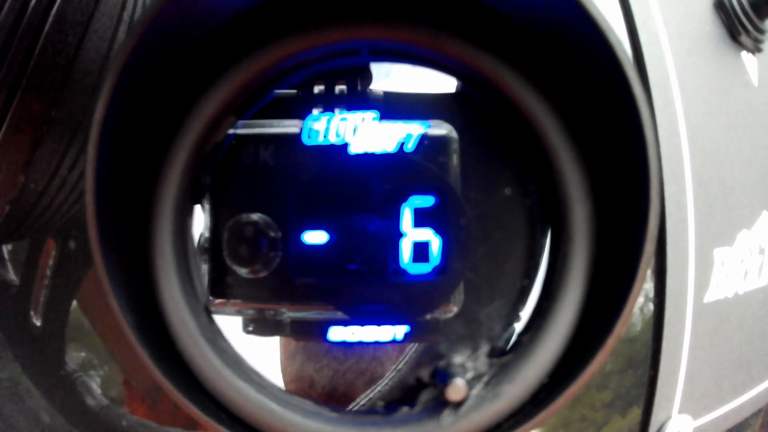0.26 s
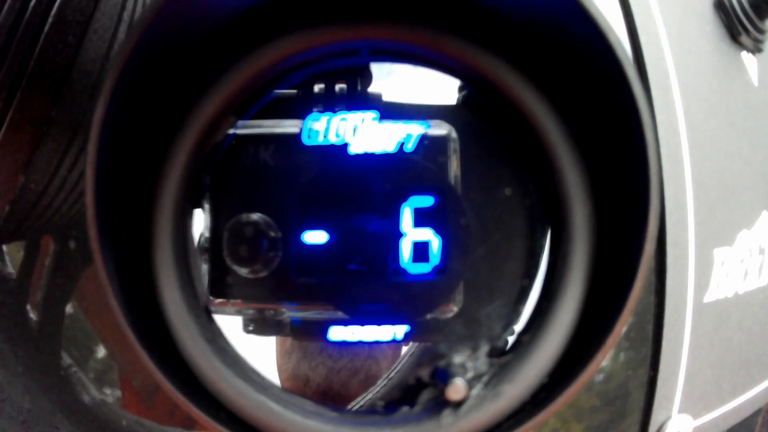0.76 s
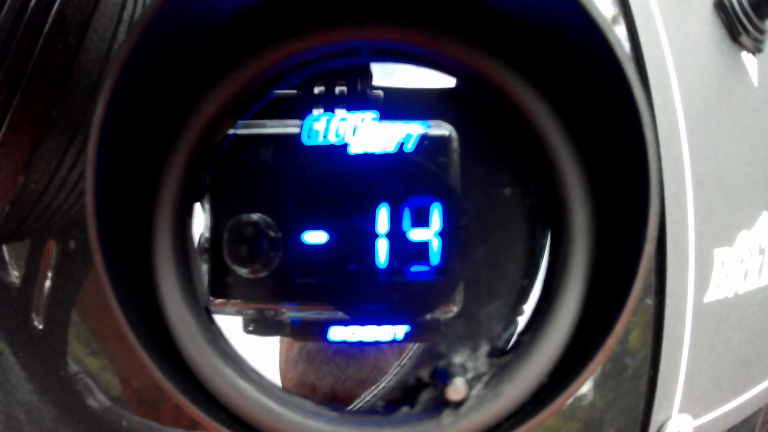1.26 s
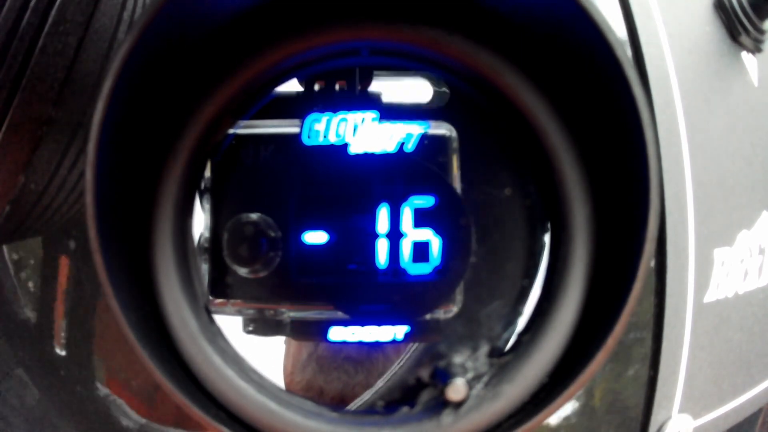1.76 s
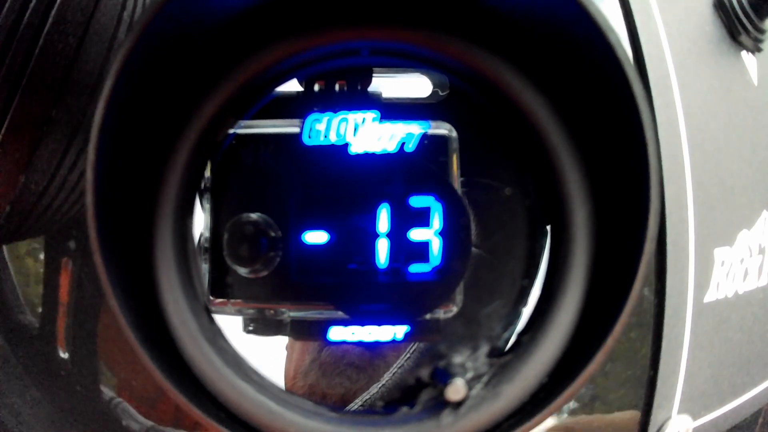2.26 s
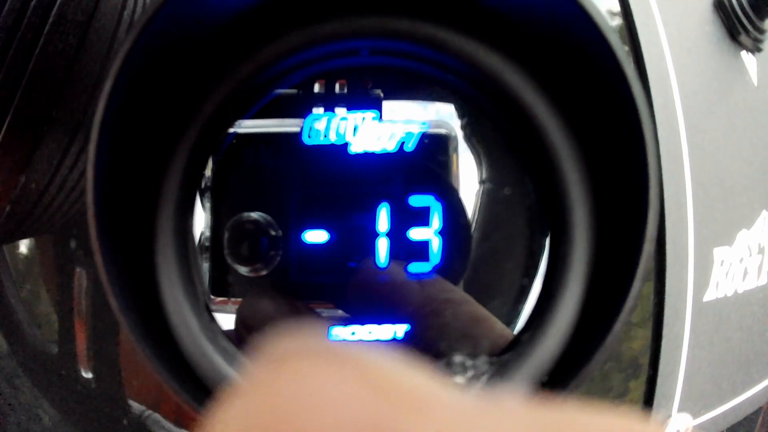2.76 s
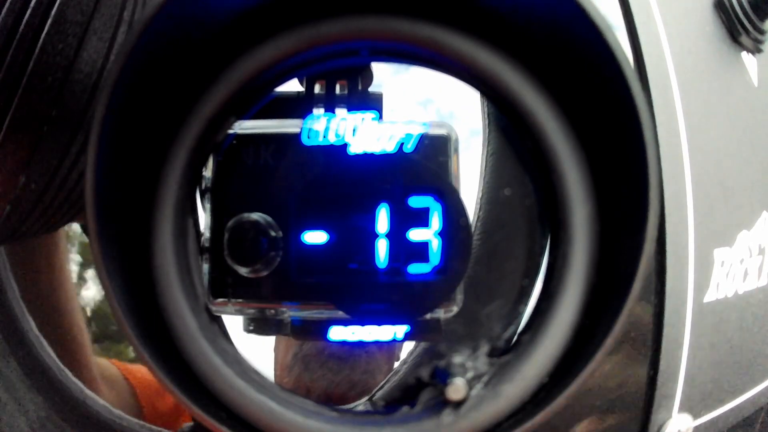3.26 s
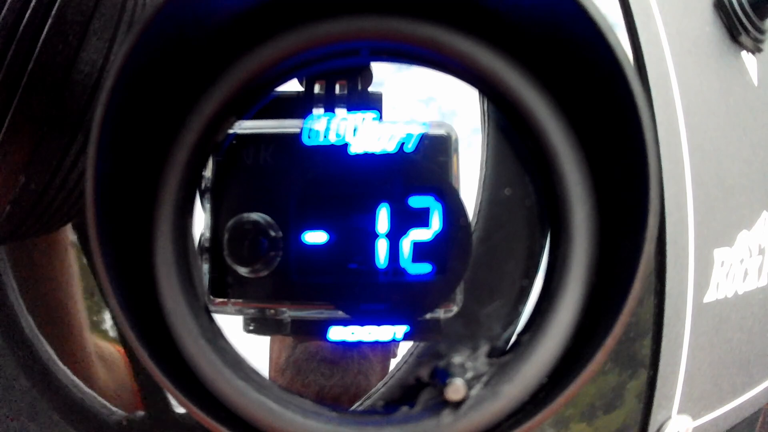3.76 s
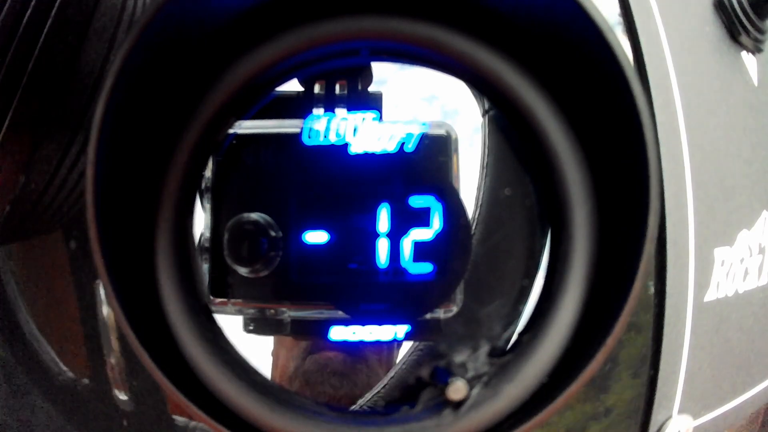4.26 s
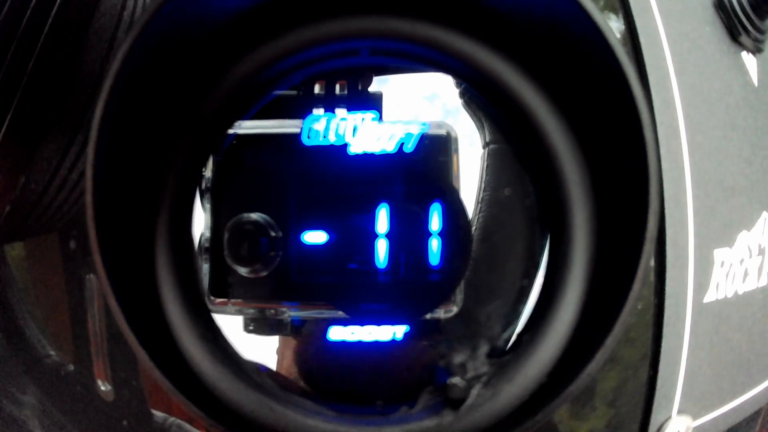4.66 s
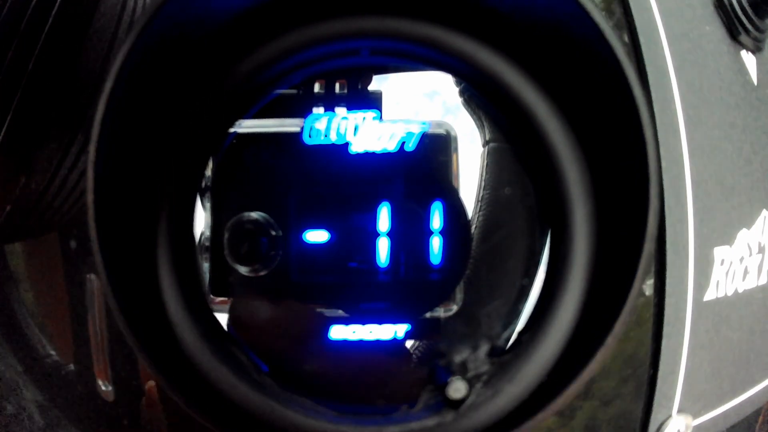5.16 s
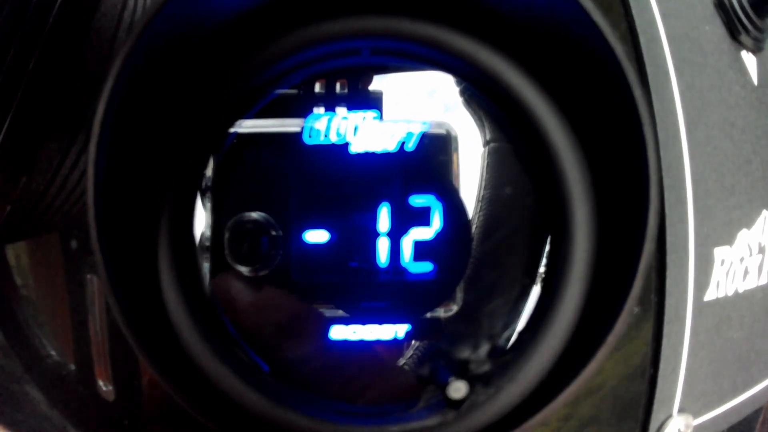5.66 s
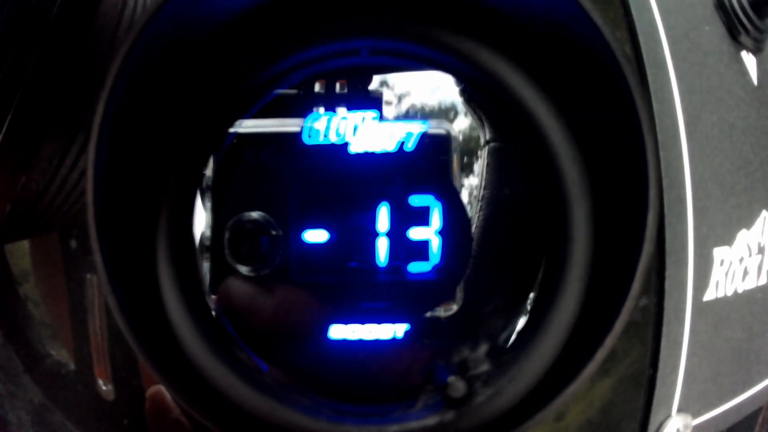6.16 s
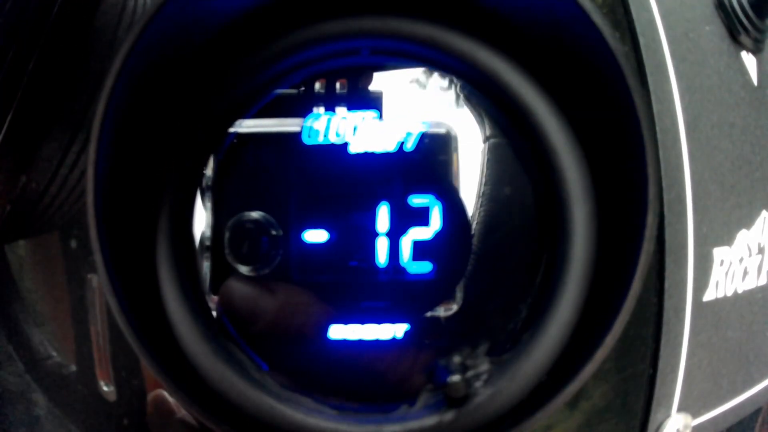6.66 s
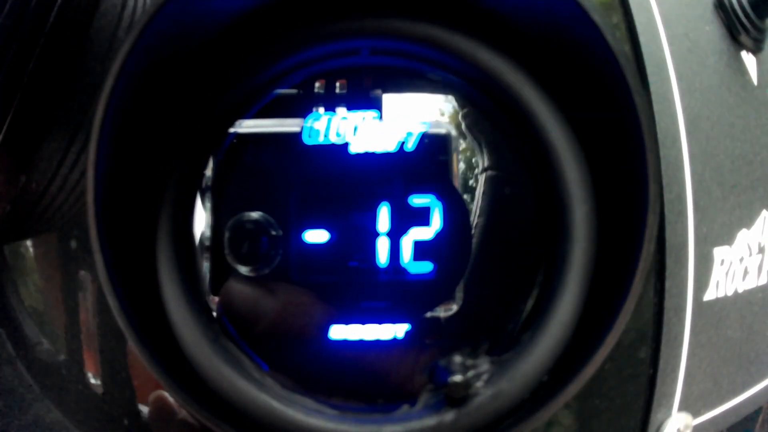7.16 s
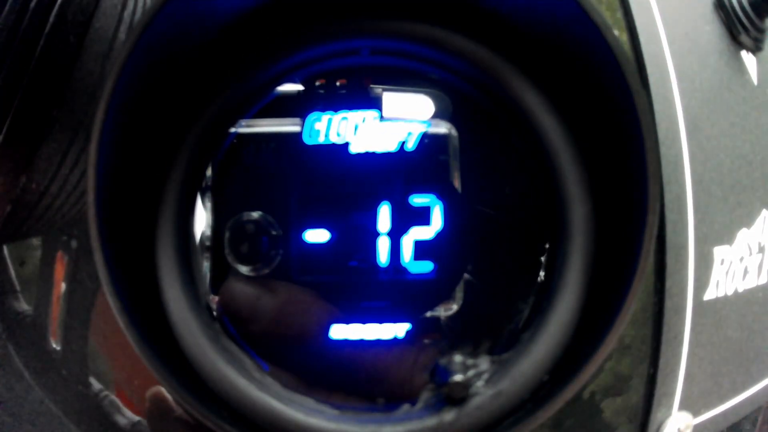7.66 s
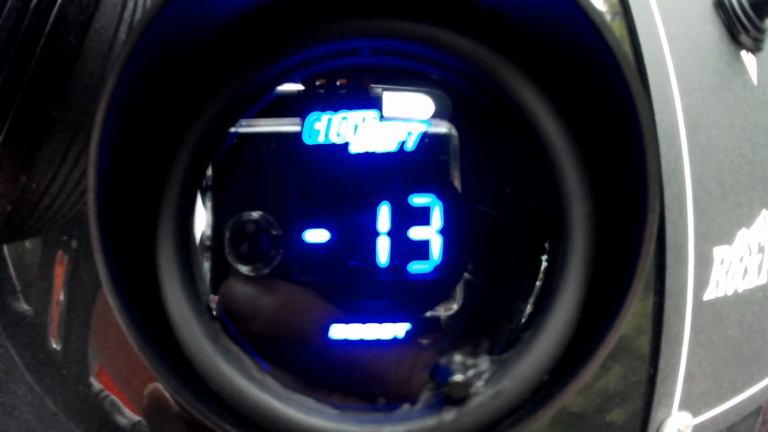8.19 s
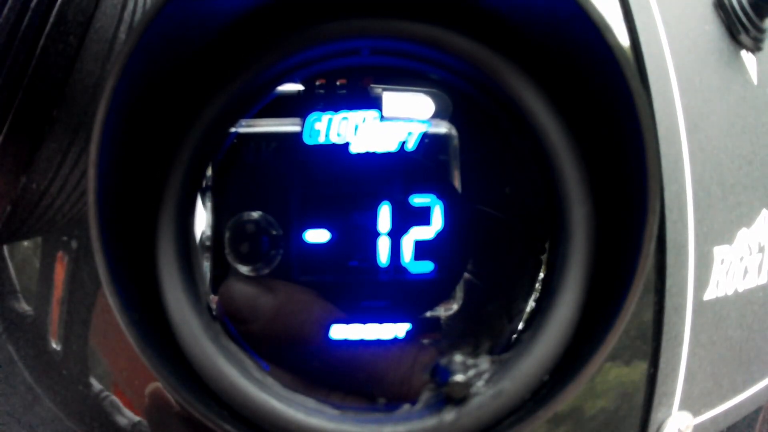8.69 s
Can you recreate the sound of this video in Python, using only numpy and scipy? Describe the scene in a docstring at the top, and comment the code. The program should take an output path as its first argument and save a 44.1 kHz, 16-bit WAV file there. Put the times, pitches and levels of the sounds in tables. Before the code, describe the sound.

Close on a jet boat through a sealed, boxy housing. From 0 s a three-cylinder engine drones loudly at high revs, coarse exhaust roar and spray hiss around it, peaks distorting, with spits and sharp overload clicks mostly in the first second. A thin supercharger whine near 3.9 kHz sinks to below 3 kHz and disappears by about 1.4 s; a faint octave flickers above it. Low thumps hit the case near 0.3 s and between 1.1 and 1.8 s. The throttle shuts around 1.3 s; pitch and level tumble unevenly, settling by 2.5 s into a far quieter idle, a hum near 260 Hz gently hunting about twice a second over muffled exhaust. At 3.3 s the sound snaps out for an instant with a click, then thumps follow at 3.4, 3.7 and 4.1 s. Soft scuffs brush the case at 5.4 s, brighter, and 5.9 s, duller. Idle and low buffeting continue to 8.9 s.

```python
"""Jet boat engine running down to idle

A three-cylinder jet boat engine, heard through a sealed housing, runs down from high revs and settles at idle.
Exhaust orders (tones on multiples of the crank speed) drone in the hull; a supercharger whine sinks away.
Exhaust and spray roar as noise shaped by the resonances of hull and housing; spits and overload clicks crackle.
Low buffeting, thumps and scuffs sound on the case; the sound cuts out once with a click. The loudest peaks clip."""
import sys
import numpy as np
from scipy import signal
from scipy.fft import rfft, irfft, next_fast_len
from scipy.io import wavfile
from scipy.ndimage import map_coordinates

SR = 44100
rng = np.random.default_rng(int(sys.argv[2]) if len(sys.argv) > 2 else 0)


def to_wav(sig):
    """Store sig (one row per channel, or 1-D mono) as 16-bit WAV at the path in sys.argv[1].

    Samples outside -1..1 are clipped; the rate is SR.
    """
    pcm = np.clip(np.atleast_2d(sig), -1, 1) * 32767
    pcm = np.round(pcm).astype(np.int16)
    wavfile.write(sys.argv[1], SR, pcm.T)  # frames by channels


def convert_level_to_amplitude(level_db):
    """Map a level in decibels to its linear amplitude factor."""
    exponent = np.asarray(level_db, float) / 20
    return 10 ** exponent


N = 393805  # length [samples]


def unit(x):
    """Scaled to rms 1."""
    return x / np.sqrt(np.mean(x ** 2) + 1e-20)


def curves(rows):
    """One value per sample for each column after the time."""
    times, *columns = np.transpose(rows)
    return [np.interp(np.arange(N) / SR, times, column) for column in columns]


def wobble(rate):
    """A smooth random curve, rate knots a second."""
    knots = rng.standard_normal(int(N * rate / SR) + 4)
    return map_coordinates(knots, [np.arange(N) * rate / SR])


def bump(middle, half):
    """A soft swell in time, 1 at its middle [s] and 1/e at half [s] to either side."""
    return np.exp(-((np.arange(N) / SR - middle) / half) ** 2)


def coloured(x, hz, db):
    """x through a spectrum of dB points on a log frequency axis."""
    size = next_fast_len(N + 8192)
    bins_hz = np.fft.rfftfreq(size, 1 / SR) + 1
    gain = convert_level_to_amplitude(np.interp(np.log(bins_hz), np.log(hz), db))
    return irfft(rfft(x, size) * gain, size)[..., :N]


def blend(x, table, share):
    """Noise whose colour moves from the idling to the loaded spectrum as share goes from 0 to 1."""
    hz, loaded_db, idle_db = np.transpose(table)
    loaded = unit(coloured(x, hz, loaded_db))
    idling = unit(coloured(x, hz, idle_db))
    return unit(share * loaded + (1 - share) * idling)


def turns(speed, unsteady):
    """Angle in radians from turns per second; a random wobble makes the speed hunt a little."""
    return 2 * np.pi * np.cumsum(speed * (1 + unsteady * wobble(14))) / SR


def orders(angle, multiples, levels_db, waver_db, rate=12):
    """Tones on multiples of an angle, in step as one pulse, each wavering by itself."""
    phase = 2.1  # radians, shared so that the exhaust orders add up to a downward thud
    return sum(convert_level_to_amplitude(db + waver_db * wobble(rate)) * np.sqrt(2) * np.cos(k * angle + phase)
               for k, db in zip(multiples, levels_db))


def buffeting():
    """The case is buffeted and thumped: low noise whose level swells and lumps."""
    # slow swell of the buffeting: (time [s], level [dB])
    buffet = [(0, -53), (.5, -36), (2.2, -37), (4.3, -40), (5.0, -45), (5.5, -50.5), (7, -41.5),
              (8.93, -37.5)]
    # low thumps on the case: (time [s], half length [s], level [dB])
    thumps = [(0.348, 0.17, -26), (1.12, 0.034, -35), (1.49, 0.074, -35), (1.791, .08, -36),
              (3.427, .05, -27), (3.703, 0.03, -26), (4.072, 0.052, -32)]
    buffet_db, = curves(buffet)
    level = convert_level_to_amplitude(buffet_db + 1.8 * wobble(17))
    level = level + sum(convert_level_to_amplitude(db) * bump(s, half) for s, half, db in thumps)
    rumble = coloured(rng.standard_normal(N), [8, 22, 45, 90, 200, 600], [-35.5, -12, -1.0, -13.5, -50.0, -120])
    return level * unit(rumble)


def scuffing():
    """Soft rubs on the case: short swells of bright and dull resonant noise."""
    # rubs: (time [s], half length [s], bright level [dB], dull level [dB])
    scuffs = [(5.418, 0.069, -43, -41), (5.919, 0.03, -50, -26)]
    bright = unit(coloured(rng.standard_normal(N),
                           [1200, 1600, 1900, 2260, 2450, 2620, 3045, 3650, 3880, 4515, 5430, 9000],
                           [-41.5, -2, -19, 7.5, -4, 2.5, -17, -2.5, -12, -9.0, -28, -120]))
    dull = unit(coloured(rng.standard_normal(N), [300, 550, 850, 1300, 3000], [-12.0, -3.0, -7.5, -36.5, -120]))
    return sum(bump(s, half) * (convert_level_to_amplitude(bright_db) * bright + convert_level_to_amplitude(dull_db) * dull)
               for s, half, bright_db, dull_db in scuffs)


def crackle():
    """Spits of very uneven size, random impulses while the engine pulls hard, and brief sharp overload clicks."""
    # overload clicks: (time [s], impulse level before colouring [dB])
    overload_clicks = [(0.1152, -34), (0.3924, -37.5), (0.4677, -34), (0.5134, -46), (0.7742, -46.5),
                       (0.8936, -51.5), (1.0056, -47), (1.1118, -36)]
    until, fade = 0.55, 0.2  # s, when the spits have halved and how gradually they go
    spits_per_s, spits_db = 160, -40
    size = rng.standard_normal(N) * convert_level_to_amplitude(5.8 * wobble(60))
    impulses = (rng.random(N) < spits_per_s / SR) * size
    spits = unit(coloured(impulses, [600, 1500, 3000, 5500, 7500, 12000], [-29, -3.5, -7.0, -13.5, -17, -60.5]))
    fading = 1 / (1 + np.exp((np.arange(N) / SR - until) / fade * 2))
    click_s, click_db = np.transpose(overload_clicks)
    clicks = np.bincount(np.round(click_s * SR).astype(int), convert_level_to_amplitude(click_db), N)
    clicks = coloured(clicks, [800, 2500, 6000, 12000, 18000], [-9.5, 11.5, 8.5, 4.5, -15.5])
    return convert_level_to_amplitude(spits_db) * spits * fading + clicks


def exhaust_roar(firing, load, exhaust_db):
    """Exhaust noise that pulses with each firing, partly the same clatter in every engine cycle."""
    # exhaust noise in hull and housing: (frequency [Hz], loaded relative level [dB], idling relative level [dB])
    hull = [(10, -49, -40.5), (35, -26.5, -13), (65.4, -17.5, -2.5), (126, -2, -4.5), (192, -10.5, -2.5),
            (256.8, -1, -1), (335, 2.5, -2), (412.3, -7.5, -6), (496, -14, -10.5), (570, -1.5, -2),
            (690, -3, -1), (817, 0, -1.5), (947, -4.5, -11), (1136, -16.5, -16.5), (1349, -24, -37.5),
            (2100, -56, -59.5), (4000, -120, -120)]
    pattern = rng.standard_normal(128)
    cycles = firing / (6 * np.pi)  # three firings to a cycle
    clatter = map_coordinates(pattern, [cycles * len(pattern)], order=1, mode="grid-wrap")
    puffs = rng.standard_normal(N) * (1 + (0.028 + 0.17 * load) * np.cos(firing))
    puffs = puffs + convert_level_to_amplitude(-17.5 + 2.1 * load) * clatter
    surge_db = (0.82 + 0.29 * load) * wobble(10)
    return convert_level_to_amplitude(exhaust_db + surge_db) * blend(puffs, hull, load)


def spray_hiss(load, spray_db):
    """Spray through the housing wall: noise in random swells, fluttering faster under load."""
    # spray through the wall: (frequency [Hz], loaded relative level [dB], idling relative level [dB])
    spray = [(500, -49.5, -48), (1206, -7, 0.5), (1550, 4, -3), (2375, -4.5, -6), (2720, -11.5, -13),
             (3150, -24.5, -24), (3790, -14.5, -10), (4450, -17, -15), (5040, -35, -27.5),
             (6260, -42.5, -22.5), (7700, -61.5, -47), (8460, -75.5, -64), (12000, -96.5, -91.5),
             (16000, -120, -120)]
    swell_db = 1.1 * wobble(6.9) + 0.59 * wobble(21) + 1.8 * load * wobble(45)
    hiss = rng.standard_normal(N) * convert_level_to_amplitude(swell_db)
    return convert_level_to_amplitude(spray_db) * blend(hiss, spray, load)


def roar(firing):
    """Exhaust and spray noise, both following the effort of the engine in level and colour."""
    # effort: (time [s], share of loaded colour [0-1], exhaust level [dB], spray level [dB])
    effort = [(0, 0.94, -4.5, -27), (.4, .94, -8, -31), (.75, .88, -8.5, -32.5), (1.35, .8, -11, -37),
              (1.42, 0.5, -14.5, -40.5), (1.62, 0.8, -17.5, -42), (1.76, 0.6, -20, -43.5),
              (2.3, 0.5, -22.5, -47), (2.9, .23, -23.5, -46.5), (3.9, 0.2, -24, -48), (5.4, 0, -25, -46),
              (6.7, 0.06, -25.5, -46), (7.3, 0, -23.5, -45.5), (8.93, 0.05, -22.5, -42.5)]
    load, exhaust_db, spray_db = curves(effort)
    load = np.clip(load, 0, 1)
    return exhaust_roar(firing, load, exhaust_db) + spray_hiss(load, spray_db)


def supercharger(whine_hz, whine_db):
    """The compressor whine: a roughened tone with a separately unsteady octave over it."""
    # octave over the compressor tone: (time [s], level [dB])
    octave = [(0, -70), (.45, -68), (.55, -59), (.66, -60), (.69, -70), (.73, -59), (.79, -75), (.87, -58),
              (.96, -70), (1.02, -57), (1.12, -54), (1.25, -56), (1.32, -65), (1.45, -80)]
    spin = turns(whine_hz, unsteady=0.0015) + 1.2 * wobble(150)  # turbulent air roughens the tone
    tone = orders(spin, [1], [whine_db], waver_db=5, rate=45)
    return tone + orders(turns(whine_hz, unsteady=0.0015), [2], curves(octave), waver_db=3.0, rate=25)


def loaded_drone(crank_speed):
    """Exhaust orders under load glide through the hull's resonances; also the crank angle."""
    # crank orders: (multiple of the crank [ratio], level at the start before the hull's lift [dB])
    loaded_orders = [(1.5, -16.5), (2, -18.5), (3, -17.5), (4, -18), (4.5, -22), (3.5, -31), (8, -27),
                     (10.5, -26)]
    # lift by the hull's resonances: (frequency [Hz], gain [dB])
    hull_lift = [(90, 0), (105, 2), (120, 3), (135, -0.5), (155, -18), (190, -13.5), (215, -4.5),
                 (235, -10.5), (250, -1.5), (265, 6.5), (285, 0), (302, -2.5), (311, 9), (319, 9),
                 (326, -7), (345, 0.5), (360, -11.5), (380, 7), (480, -6), (600, 3.5), (700, -1.5),
                 (810, 8), (1000, -2.5)]
    fade_db_per_s = 5.5  # the orders weaken as the throttle closes
    dropout_db = 50 * bump(0.265, 0.03)  # the lowest orders drop out briefly
    now = np.arange(N) / SR
    lift_hz, lift_db = np.transpose(hull_lift)
    levels = [db - fade_db_per_s * now + np.interp(k * crank_speed, lift_hz, lift_db) - (k <= 2) * dropout_db
              for k, db in loaded_orders]
    angle = turns(crank_speed, unsteady=0.0032)
    return orders(angle, np.transpose(loaded_orders)[0], levels, waver_db=0.76), angle


def idle_drone():
    """Exhaust orders at shut throttle, led by the ninth, on a hunting crank speed; also the crank angle."""
    # throttle shut: (time [s], crank speed before hunting [turns per s])
    idle = [(1.4, 41), (1.52, 38), (1.66, 36), (1.76, 34.4), (1.9, 33.6), (2.05, 32.4), (2.16, 31),
            (2.25, 30), (2.45, 29.7), (2.7, 29.35), (3.1, 29.2), (3.35, 28.8), (4.6, 28.8), (5.1, 28.9),
            (5.55, 28.8), (6.2, 28.75), (7.25, 29), (8.2, 29), (8.93, 28.75)]
    # moments of highest speed as the idle hunts: [s]
    hunt_peaks = [1.95, 2.37, 2.78, 3.15, 3.55, 4.0, 4.3, 4.82, 5.25, 5.67, 6.0, 6.3, 6.68, 7.08, 7.5, 7.97,
                  8.33, 8.77, 9.2]
    # the ninth order, the main idle hum: (time [s], level [dB])
    ninth = [(1.45, -46), (2.0, -33), (2.3, -36), (2.7, -25.5), (3.1, -26), (3.36, -29.5), (3.56, -27.5),
             (3.9, -29), (4.26, -24), (4.6, -26), (5.11, -23.5), (5.56, -23.5), (6.21, -26), (6.66, -22.5),
             (7.26, -26.5), (7.61, -25), (8.21, -24.5), (8.61, -27), (8.93, -23.5)]
    # other strong orders: (multiple of the crank [ratio], level at 0 s once settled [dB], drift [dB per s])
    idle_orders = [(2, -37, 0.23), (3, -25, -0.28), (4.5, -27, -0.73), (7.5, -29.5, -1.0)]
    # these come and go while the engine settles: (time [s], then the change of each in turn [dB], four columns)
    settling = [(1.45, 4, -12, -14, -10), (1.56, 16, -14, -12, -8), (1.68, 14, -14, -13, -4),
                (1.78, -2, -12, -5, 5), (1.9, -4, -10, -8, -6), (2.03, 10, -5, -6, -6),
                (2.15, 6, -4, -18, -3), (2.28, 0, -1, -8, 5), (2.4, 1, 0, -14, -8), (2.55, 1, 0, -1, 1),
                (2.8, 0, 0, 0, 0)]
    # weak orders: (multiple of the crank [ratio], level [dB])
    faint = [(1, -50.5), (1.5, -48), (6, -47.5), (6.5, -44.5), (8.5, -49.5), (10.5, -41.5), (12, -43),
             (18.5, -42), (21, -40.5)]
    hunt_swing, idle_speed = 0.25, 28.8  # turns per s
    now = np.arange(N) / SR
    (speed,), (ninth_db,) = curves(idle), curves(ninth)
    hunt = np.cos(2 * np.pi * np.interp(now, hunt_peaks, np.arange(len(hunt_peaks))))
    angle = turns(speed + hunt_swing * hunt, unsteady=0.0015)
    levels = [db + change_db + drift_db * now + 0.4 * wobble(2.2)
              for (k, db, drift_db), change_db in zip(idle_orders, curves(settling))]
    multiples = [9, *np.transpose(idle_orders)[0]]
    ragged_db = 1.6 + 0.32 * np.abs(speed - idle_speed)  # ragged while it settles
    strong = orders(angle, multiples, [ninth_db, *levels], waver_db=ragged_db)
    return strong + orders(angle, *np.transpose(faint), waver_db=4), angle


def engine():
    """Loaded orders and whine hand over to the idle orders as the throttle shuts; also the firing angle."""
    # compressor tone: (time [s], frequency [Hz], level [dB])
    whine = [(0, 3892, -39), (.1, 3785, -44), (.22, 3699, -47), (.3, 3671, -42), (.35, 3650, -50),
             (.4, 3625, -38), (.46, 3611, -47), (.52, 3607, -36), (.58, 3601, -46), (.68, 3480, -43),
             (.77, 3400, -47), (.81, 3270, -60), (.86, 3128, -49), (.95, 3025, -51), (1.1, 2963, -53),
             (1.25, 2911, -48), (1.34, 2857, -53), (1.45, 2700, -73)]
    gearing = 46.5  # compressor tone cycles per crank turn
    shut = np.clip((np.arange(N) / SR - 1.31) / 0.061, 0, 1)
    whine_hz, whine_db = curves(whine)
    loaded, fast = loaded_drone(whine_hz / gearing)
    loaded = loaded + supercharger(whine_hz, whine_db)
    idling, slow = idle_drone()
    firing = 1.5 * np.where(shut < 0.5, fast, slow)  # three firings in two turns
    return (1 - shut) * loaded + shut * idling, firing


def scene():
    """All layers summed to one signal, then coloured slightly differently on the left and right."""
    # balance: (frequency [Hz], left over right [dB])
    left_over_right = [(800, 0), (1000, -1.5), (1300, -1), (2000, -1.8), (4500, -5), (8000, 0)]
    tones, firing = engine()
    mono = buffeting() + scuffing() + crackle() + roar(firing) + tones
    hz, db = np.transpose(left_over_right)
    return np.array([coloured(mono, hz, db / 2), coloured(mono, hz, -db / 2)])


def cut(x):
    """The sound gives way to a brief offset, snaps to zero with a click and fades back."""
    moment, rise, recovery, edge = 3.30495, 0.001, 0.0066, 0.000025  # s
    offset_db = -17.5
    t = np.arange(N) / SR - moment
    near = np.exp(-(t / np.where(t < 0, rise, recovery)) ** 2)
    step = (1 - np.tanh(t / edge)) / 2
    return x * (1 - near) + convert_level_to_amplitude(offset_db) * near * step


def soft_ceiling(x):
    """The input saturates: the loudest peaks round off towards a ceiling."""
    ceiling, hardness = 1.06, 6  # full scale is 1; a higher hardness sharpens the knee
    return x / (1 + np.abs(x / ceiling) ** hardness) ** (1 / hardness)


def low_pass(x):
    """Removes everything above the highest recorded frequency."""
    return signal.sosfilt(signal.butter(12, 20000, fs=SR, output="sos"), x)


def record(dry):
    """The sound cuts out once and its loudest peaks round off."""
    mix = soft_ceiling(cut(dry))
    return low_pass(mix)


dry = scene()
out = record(dry)
to_wav(out)
```